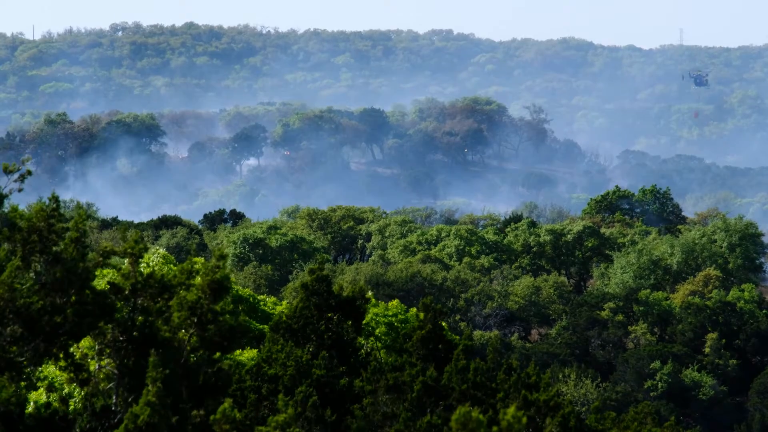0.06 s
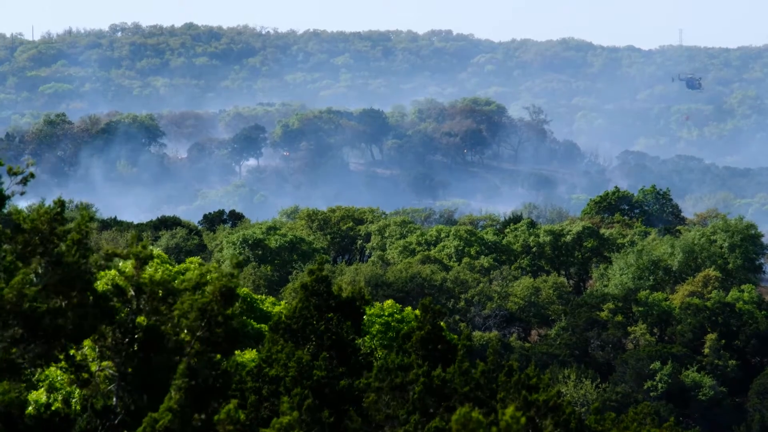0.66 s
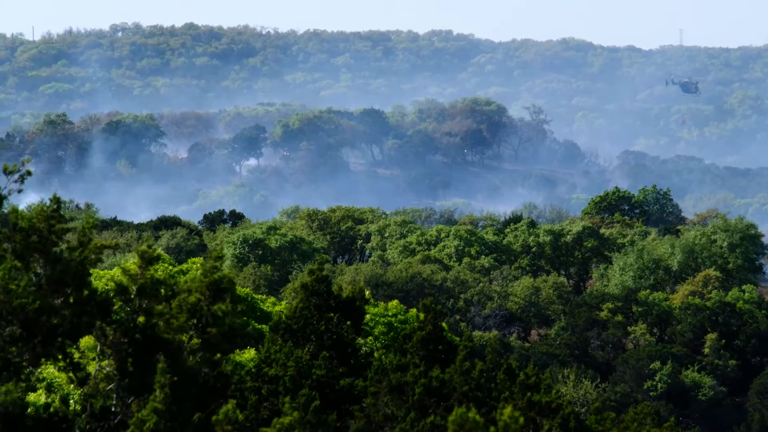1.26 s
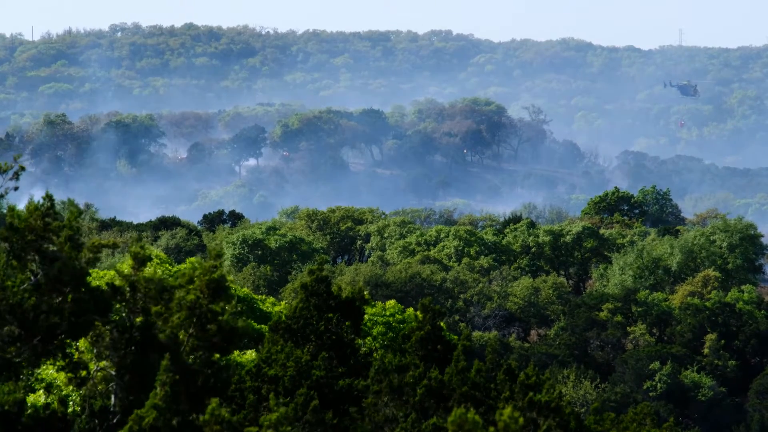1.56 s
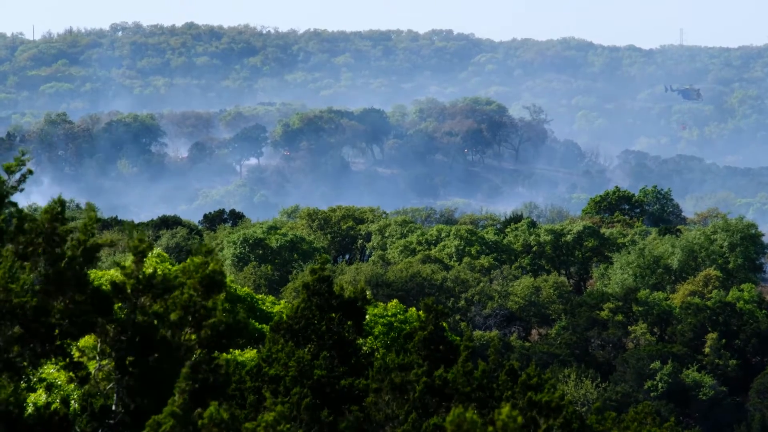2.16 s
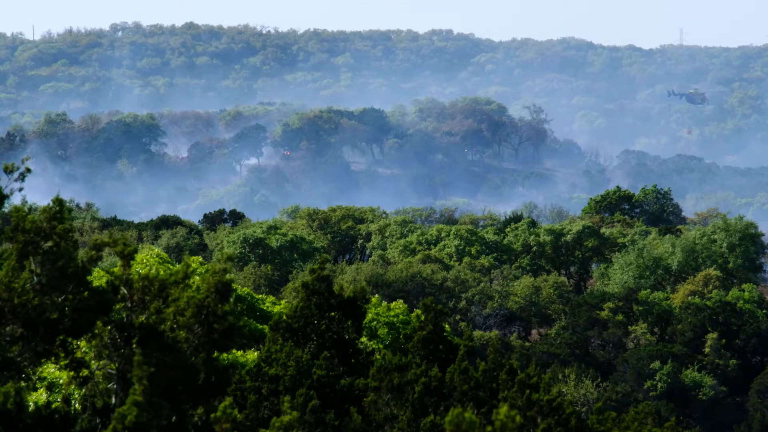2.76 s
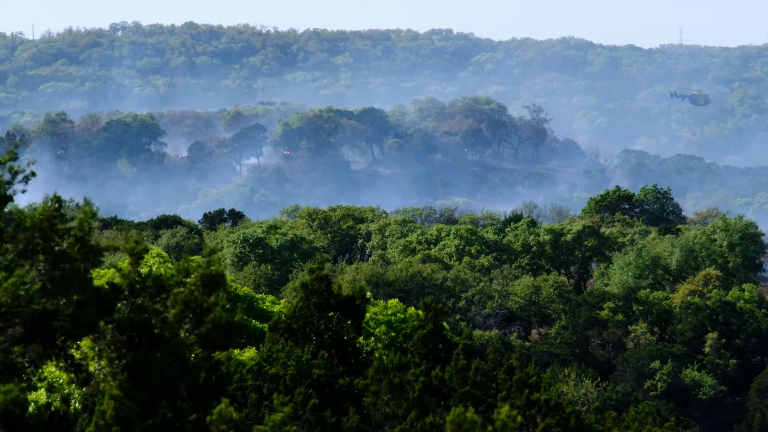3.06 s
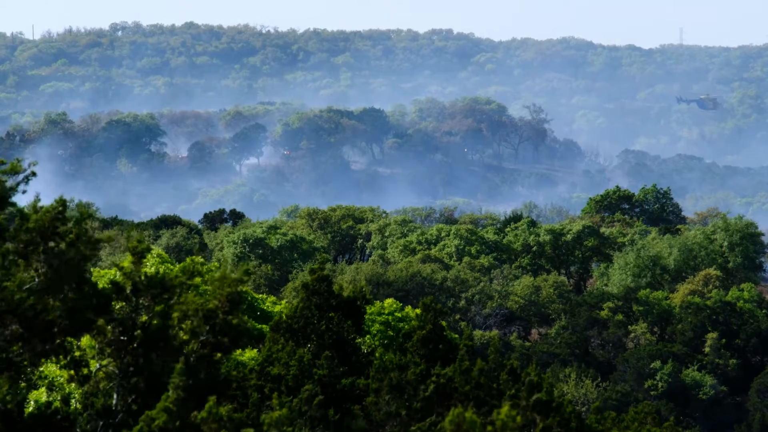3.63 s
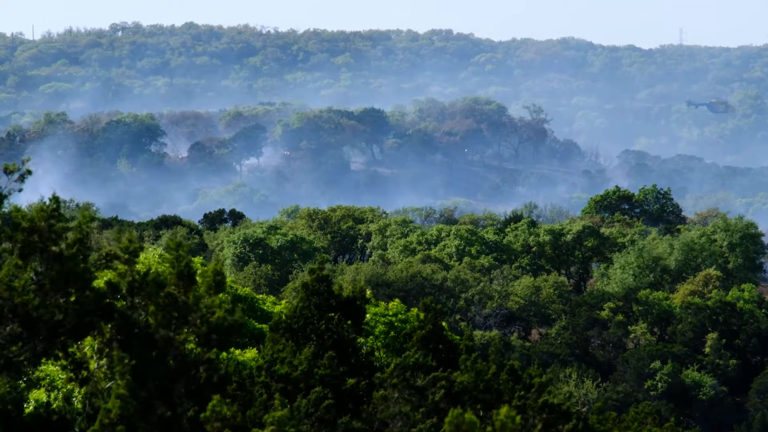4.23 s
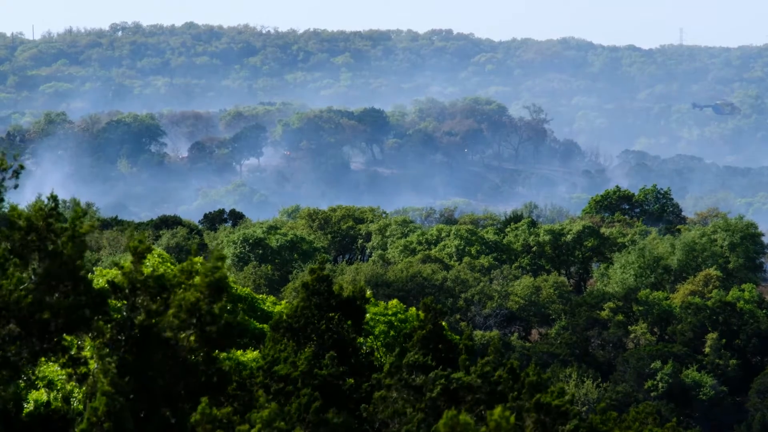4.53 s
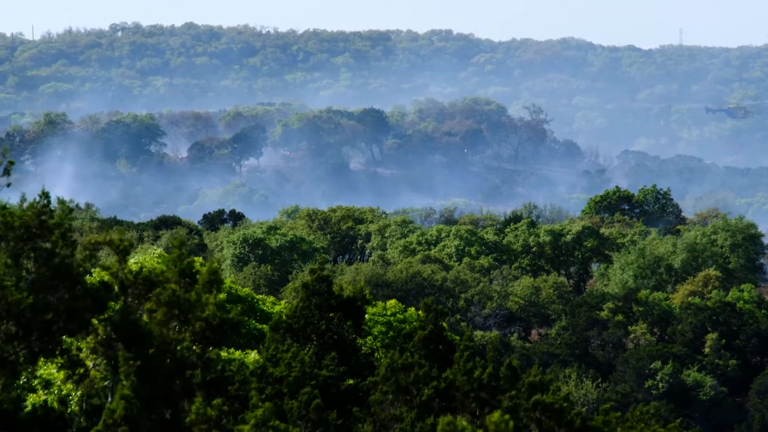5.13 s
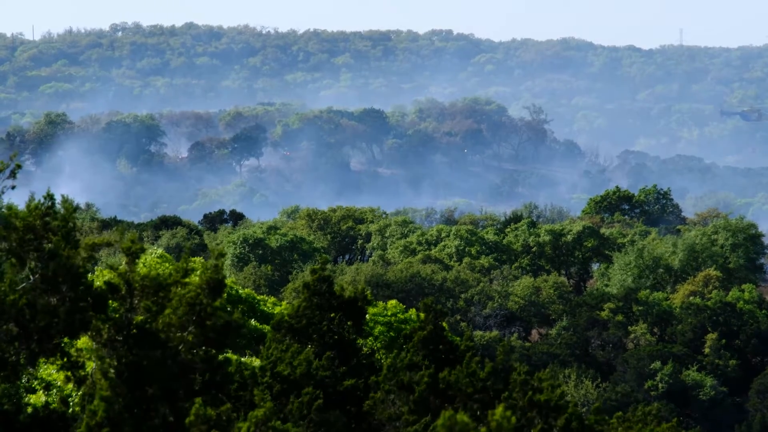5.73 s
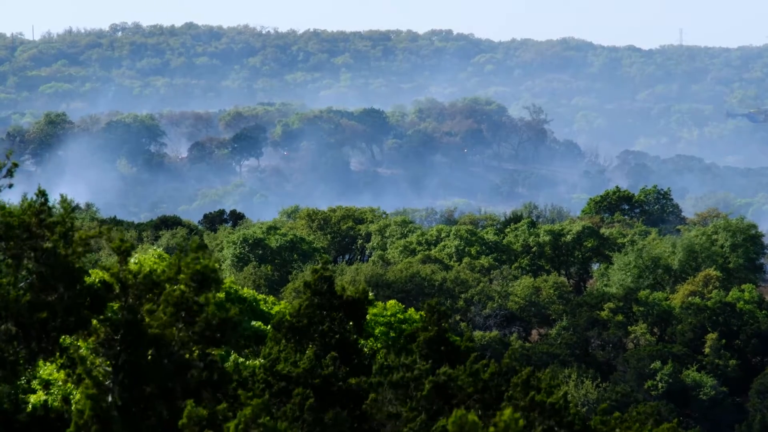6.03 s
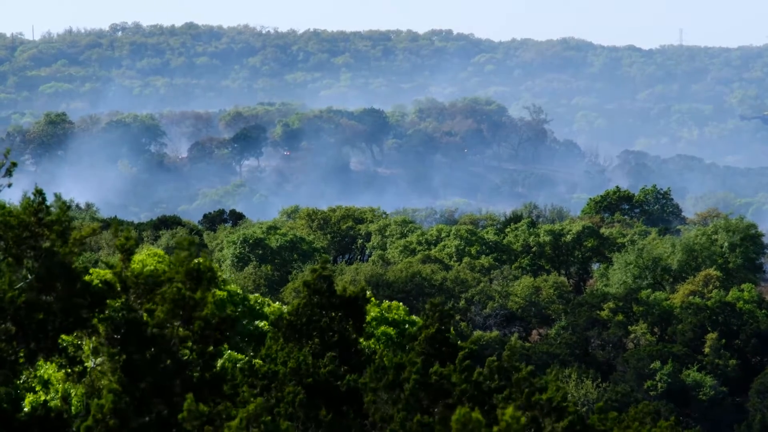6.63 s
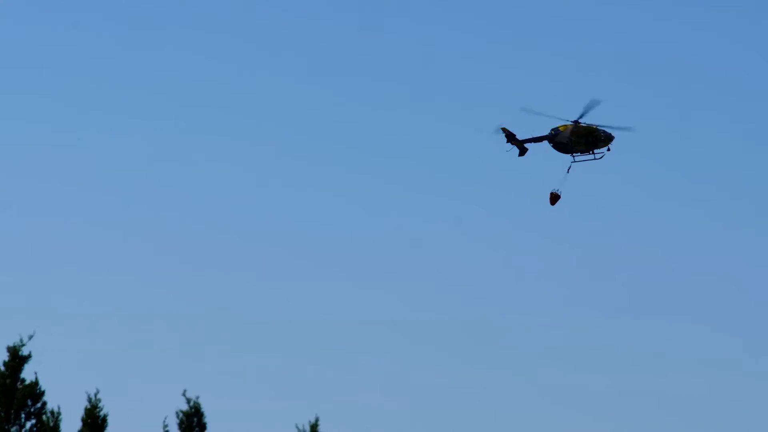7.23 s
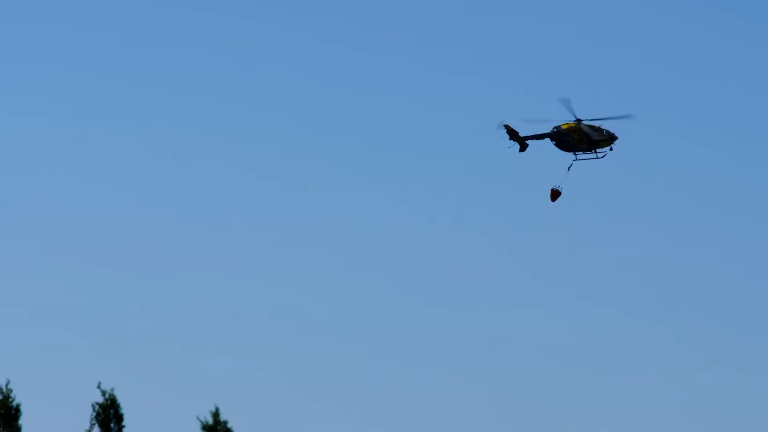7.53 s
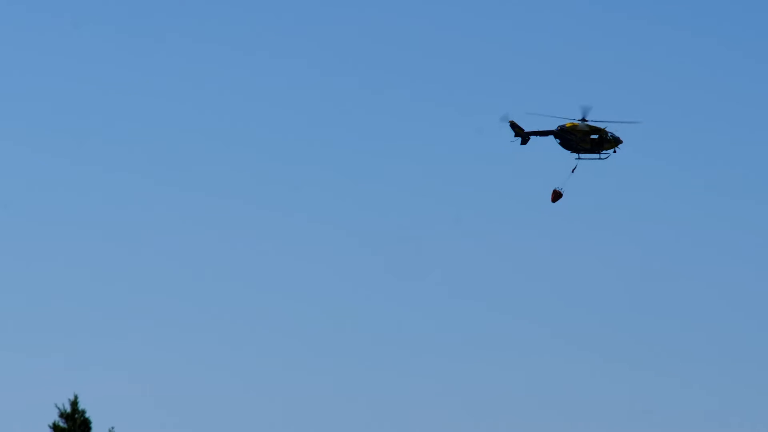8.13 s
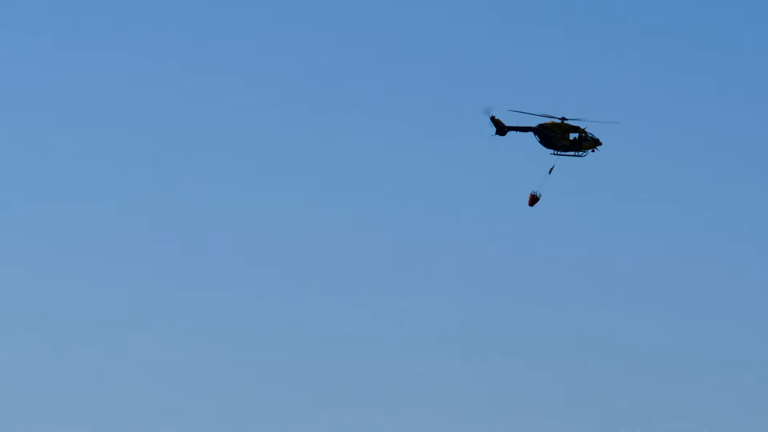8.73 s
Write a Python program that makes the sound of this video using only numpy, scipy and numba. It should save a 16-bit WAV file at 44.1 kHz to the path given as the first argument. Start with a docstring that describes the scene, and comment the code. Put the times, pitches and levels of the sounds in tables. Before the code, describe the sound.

A faint, faraway helicopter drones under thumping wind gusts, until it abruptly gives way to a close helicopter's steady, chopping roar.

```python
"""A helicopter flies near: both rotors chop its roar of churning air and hum their own blade tones.
This close pass follows a sudden cut. Before it, a helicopter drones far off over woodland, while
gusts thump the two openings (ports) of a camera microphone and a few taps and rustles sound close by.
The camera turns itself down under the strongest wind."""
import sys
import numpy as np
from scipy import signal
from scipy.fft import rfft, irfft, next_fast_len
from scipy.io import wavfile
from scipy.ndimage import uniform_filter1d, minimum_filter1d
from numba import njit

SR = 44100
rng = np.random.default_rng(int(sys.argv[2]) if len(sys.argv) > 2 else 0)


def bounce(signal):
    """Save signal as a 16-bit WAV file at the path given by the first command-line argument."""
    frames = np.transpose(np.atleast_2d(signal))
    limited = np.clip(frames, -1, 1)
    pcm = np.round(limited * 32767).astype(np.int16)
    wavfile.write(sys.argv[1], SR, pcm)


N = 387198
TIME = np.arange(N) / SR
CUT_S = 7.145  # the woods end and the close pass begins


def undb(db):
    """Turn decibels into a number to multiply a sound by."""
    return 10 ** (np.asarray(db) / 20)


def unit(x):
    """Scale a sound so that its average strength (rms) is 1."""
    return x / np.sqrt(np.mean(x ** 2))


def curve(table):
    """Join rows of (time, value) with straight lines."""
    return np.interp(TIME, *np.transpose(table))


def wander(per_s):
    """A smooth random wobble of size 1 that finds a new value about per_s times a second."""
    hold = max(int(SR / per_s), 2)
    steps = rng.standard_normal(N // 40)[np.arange(N) // hold % (N // 40)]
    return unit(uniform_filter1d(uniform_filter1d(steps, hold), hold))


def bump(peak_s, half_width_s):
    """A smooth rise and fall around one moment."""
    return np.exp(-np.minimum(((TIME - peak_s) / half_width_s) ** 2, 20))


def noise(colour):
    """Noise of strength 1, shaped by rows of (pitch_hz, level_db) and fading beyond their ends."""
    hz, db = np.transpose(colour)
    size = next_fast_len(N)
    freqs = np.maximum(np.arange(size // 2 + 1) * SR / size, 1)
    gain = undb(np.interp(np.log(freqs), np.log(hz), db))
    gain *= np.minimum(freqs / hz[0], 1) ** 2 * np.minimum(hz[-1] / freqs, 1) ** 4
    return unit(irfft(rfft(rng.standard_normal(size)) * gain)[:N])


def wide_noise(colour, side_db):
    """Stereo noise; side_db sets how much left and right differ."""
    return noise(colour) + undb(side_db) * noise(colour) * np.array([[1], [-1]])


def pan(db):
    """Left and right gains that make the left side louder by db."""
    return undb(np.array([[db], [-db]]) / 2)


def keep(x, hz, kind, order=2):
    """Keep the "low" or "high" side of hz; a higher order cuts more steeply."""
    return signal.sosfilt(signal.butter(order, min(hz, SR / 2 - 100), kind, fs=SR, output="sos"), x)


def add(out, start_s, sound):
    """Mix a short sound in at start_s."""
    i = max(int(start_s * SR), 0)
    out[..., i:i + sound.shape[-1]] += sound[..., :N - i]


@njit
def moving_lowpass(x, hz, damping):
    """Keep what lies below a moving pitch; with little damping it rings at that pitch."""
    y, band, low = np.empty(len(x)), 0., 0.
    for i in range(len(x)):
        g = np.tan(np.pi * hz[i] / SR)
        v = (band + g * (x[i] - low)) / (1 + g * (g + damping))
        y[i] = low + g * v
        band, low = 2 * v - band, 2 * y[i] - low
    return y


# The microphone's own noise: pitch_hz, level_db
HISS_COLOUR = [(2000, -14), (4000, -1.5), (6500, -4), (9000, -8.5), (15000, -16)]
def microphone_hiss(level_db):
    """A microphone makes a faint, steady hiss of its own."""
    return undb(level_db) * wide_noise(HISS_COLOUR, -2)


# The distant drone fading in and out on the wind: time_s, level_db
FAR_LEVEL = [(0, -34), (0.22, -32), (0.75, -34), (1.05, -32), (1.6, -35), (2.4, -36), (3.3, -33),
             (4.4, -34), (4.8, -35), (5.45, -31.5), (5.62, -34.5), (6.3, -32.5), (7.1, -39.5)]
# Its haze of sound: pitch_hz, level_db
FAR_COLOUR = [(18, -52.5), (30, -28), (43, -2), (118, 4), (146, 6.5), (167, -4.5), (319, -5), (345, -5),
              (396, -6.5), (428, -1.5), (462, -5), (541, -9.5), (899, -5), (2430, -32), (3200, -44),
              (4160, -67), (7040, -120)]
# How much of its treble the air lets through: time_s, change_db
FAR_TREBLE = [(0, -3), (0.22, -0.5), (0.6, 1), (1.05, 1), (1.5, 4.5), (2.4, -1), (3.3, -0.5), (4.3, 2),
              (5.1, 0.5), (6.1, 0), (7.1, 2.5)]
# Its faint tones: pitch_hz, level_db
FAR_TONES = [(118.4, -57), (145.3, -46.5), (193.8, -42), (355.3, -46.5), (425.3, -70)]
def far_helicopter(treble_hz=1050):
    """Distance smears the rotors into a haze; moving air fades the haze and the tones in and out."""
    # treetops scatter the higher sounds in from all sides
    scatter = wide_noise([(500, -24.5), (950, 4), (1500, -6), (2200, -18), (3200, -22)], 2.7)
    haze = wide_noise(FAR_COLOUR, -13.5) + undb(-19) * scatter
    haze *= undb(curve(FAR_LEVEL) + 0.5 + 1.1 * wander(14))
    treble = signal.sosfiltfilt(signal.butter(3, treble_hz, "high", fs=SR, output="sos"), haze)
    haze += treble * (undb(curve(FAR_TREBLE)) - 1)
    tones = 0
    for pitch_hz, level_db in FAR_TONES:
        gain = undb(level_db + 3.2 * wander(4))
        cycles = np.cumsum(pitch_hz * (1 + 0.00814 * wander(6))) / SR
        tones += gain * np.sin(2 * np.pi * cycles)
    return haze * pan(0.83) + tones


# The bright sheen on a rustle: pitch_hz, level_db
SHEEN_COLOUR = [(5000, -2.5), (6800, -5.0), (7800, -5), (9000, -5), (10200, -5.5), (11200, -11),
                (13000, -12), (15000, -24.5)]
# Soft rustles close by: peak_s, half_width_s, level_db, sheen_db, ring_hz
RUSTLES = [(1.335, 0.011, -47, -29, 7000), (1.55, 0.053, -57, -27, 7000), (1.7, 0.012, -59, -22, 7000),
           (1.81, 0.012, -53.5, -26, 7000), (1.981, 0.77, -57.5, -34, 7000), (2.558, 0.02, -50, 2.5, 8800),
           (2.66, 0.094, -60, -5, 6500), (3.35, 0.43, -70, -8, 6470), (4.02, 0.029, -50, -10, 8500),
           (4.135, 0.049, -55.5, -10, 6500), (4.252, 0.028, -51.5, -4.5, 10000),
           (4.305, 0.038, -55.5, -5, 9900), (4.365, 0.045, -59, -7.5, 7800), (4.415, 0.021, -47, -15, 7000)]
def rustles(grain_db=2, ring_db=-3, ring_width=0.12):
    """Brief, finely grained brushing noises, some with a high, ringing sheen."""
    brush = wide_noise([(1800, 16.5), (3300, 8), (5000, -3.5), (7000, -12), (12000, -52)], -2)
    sheen = wide_noise(SHEEN_COLOUR, 0.5)
    out = 0
    for peak_s, half_width_s, level_db, sheen_db, ring_hz in RUSTLES:
        ring = unit(signal.lfilter(*signal.iirpeak(ring_hz, 1 / ring_width, fs=SR), sheen))
        bright = undb(sheen_db) * (0.68 * sheen + undb(ring_db) * ring)
        out += undb(level_db) * bump(peak_s, half_width_s) * (brush + bright)
    return out * undb(grain_db * wander(600) - 2.5)


# The notes a tap rings with: pitch_hz, level_db, ring_s (time to fade by 60 dB)
TAP_NOTES = [(967, 3, 0.024), (1260, -7, 0.043), (1484, -4, 0.036), (1980, -10, 0.048), (2080, 0, 0.011),
             (2980, -3, 0.014), (3470, -11.5, 0.024), (3970, -6, 0.013), (6380, -17, 0.0085),
             (7400, -27, 0.0081)]
# Small hard taps by the camera: start_s, peak_db, left_minus_right_db, brightness_db_per_octave
TAPS = [(2.127, -20, -8.5, 2), (4.972, -30.5, -14, -3), (6.073, -22, -12, -11), (6.786, -13, -10.5, -9.5),
        (6.971, -24, -11, 5)]
def taps(snap_s=0.012):
    """Each tap snaps and rings the same short notes; a harder contact favours the high ones."""
    out = np.zeros((2, N))
    t = np.arange(SR // 10) / SR
    for start_s, peak_db, pan_db, brightness in TAPS:
        ring = 0
        for pitch_hz, level_db, ring_s in TAP_NOTES:
            gain = undb(level_db + brightness * np.log2(pitch_hz / 2000) - 60 * t / ring_s)
            ring += gain * np.sin(2 * np.pi * (pitch_hz * t + rng.random()))
        snap = keep(keep(rng.standard_normal(len(t)), 3500, "low"), 8000, "low")
        snap *= 2 * undb(-4 - 60 * t / snap_s)
        tap = (ring + snap) * (1 - np.exp(-t / 0.00038))
        add(out, start_s, undb(peak_db) * pan(pan_db) * tap / abs(tap).max())
    return out


# Gusts on the microphone's two ports: start_s, length_s, left_db, right_db
GUSTS = [(0.0, 0.044, -17, -15), (0.353, 0.35, -23.5, -21), (0.765, 0.11, -26.5, -28.5),
         (1.052, 0.29, -32, -21.5), (2.309, 0.06, -24, -29), (2.509, 0.08, -21.5, -17.5),
         (2.708, 0.023, -27, -20), (3.23, 0.037, -19, -24.5), (3.494, 0.11, -21.5, -24.5),
         (3.685, 0.21, -19.5, -24), (3.96, 0.12, -21, -24), (4.692, 0.29, -12.5, -22.5),
         (4.953, 0.081, -11, -23.5), (5.158, 0.15, -28.5, -13.5), (5.462, 0.025, -18.5, -18.5),
         (5.676, 0.038, -18, -30), (5.773, 0.081, -32, -17.5), (6.161, 0.18, -39.5, -16),
         (6.423, 0.35, -33, -18.5), (6.742, 0.18, -47, -8), (6.998, 0.076, -22, -14.5)]
def gusts(breeze_db=-42.5, rise_s=0.035, fall_s=0.076, sway_db=0.83):
    """Wind strength in dB at each port: gusts rise, hold and die away over a light breeze."""
    air = np.array([undb(breeze_db + 7.5 * wander(3.4)) for _ in range(2)])
    for start_s, length_s, left_db, right_db in GUSTS:
        before_s = np.maximum(start_s - TIME, 0)
        after_s = np.maximum(TIME - start_s - length_s, 0)
        shape = np.exp(-np.minimum(before_s / rise_s + after_s / fall_s, 20))
        air = np.maximum(air, undb([[left_db], [right_db]]) * shape)
    return [20 * np.log10(port) + sway_db * wander(9) for port in air]


def wind_rumble(gust_db, swirls_per_s=240):
    """Swirls of air stream past one port; faster air is louder and sheds smaller, higher ones."""
    flutter_db = 2.5 * wander(110)
    cutoff_hz = np.clip(285 * 2 ** ((gust_db + flutter_db + 6.5) / 17), 100, 640)
    arrivals = rng.random(N) < swirls_per_s / SR
    swirls = arrivals * np.sign(rng.standard_normal(N)) * (.5 + rng.random(N))
    rumble = moving_lowpass(unit(swirls) + undb(-6) * rng.standard_normal(N), cutoff_hz, 1.22)
    rumble = moving_lowpass(rumble, 2.35 * cutoff_hz, 1.2) / np.sqrt(cutoff_hz)
    rumble = keep(keep(rumble, 38, "high"), 57, "high")
    return unit(rumble * undb(flutter_db)) * undb(gust_db - 0.5)


# The hardest swirls to strike a port: time_s, level_db, pitch_hz, crack_db, port (-1 left, 1 right)
THUMPS = [(0.444, -2.5, 280, -54, -1), (0.777, -2.5, 297, -62, -1), (2.082, -6, 200, -52, 1),
          (2.543, 0, 275, -50, -1), (2.563, -2, 390, -50, 1), (2.588, 5, 236, -45, 1),
          (2.625, -2, 257, -52, -1), (3.554, -4.5, 254, -52, -1), (3.715, -0.5, 310, -60, -1),
          (3.819, 2.5, 357, -48, -1), (3.971, -4, 270, -52, 1), (4.078, -4, 253, -56, -1),
          (4.701, 5.5, 310, -37, -1), (4.735, -3, 230, -55, -1), (4.781, -18, 200, -17.5, -1),
          (4.819, 0, 360, -58, -1), (4.854, -0.5, 260, -34.5, -1), (4.895, 6.5, 473, -37, -1),
          (4.939, 0.5, 380, -31, -1), (4.984, 2.5, 476, -54, -1), (4.997, 4, 460, -57, -1),
          (5.011, -0.5, 440, -55, -1), (5.038, 2.5, 300, -51, -1), (5.146, -3.5, 310, -57, 1),
          (5.172, 3.5, 460, -57, 1), (5.202, -1.5, 280, -53, 1), (5.229, 0, 232, -34, 1),
          (5.281, -1, 238, -56, 1), (5.347, -2.5, 220, -52, 1), (5.455, -0.5, 258, -54, -1),
          (5.508, 2.5, 290, -39, 1), (5.663, -2, 297, -52, -1), (5.708, -5.5, 250, -54, -1),
          (5.785, -3, 220, -52, 1), (5.809, -0.5, 187, -56, 1), (6.174, -4, 376, -56, 1),
          (6.215, 1, 288, -36.5, 1), (6.244, -2, 300, -54, 1), (6.27, -4, 405, -57, 1),
          (6.493, -9, 190, -54, 1), (6.519, -5, 260, -52, 1), (6.559, -0.5, 327, -35, 1),
          (6.594, -3.5, 290, -52, 1), (6.641, 1.5, 200, -37, 1), (6.659, 1, 394, -41, 1),
          (6.684, 4.5, 325, -55, 1), (6.748, 1, 330, -50, 1), (6.831, 6.5, 420, -36.5, 1),
          (6.869, 3, 206, -34, 1), (6.89, 7.5, 296, -34, 1), (6.912, 5, 305, -60, 1),
          (6.956, 2.5, 377, -42, 1), (7.069, -1.5, 252, -35.5, 1)]
def wind_thumps(crack_s=0.00071, wake_s=0.0055, wake_hz=790):
    """A big swirl swings the air pressure; a tiny crack sounds with the crest of the swing, and a ragged wake
    follows."""
    out = np.zeros((2, N))
    t = np.arange(-1200, 1200) / SR
    for time_s, level_db, pitch_hz, crack_db, port in THUMPS:
        speed = pitch_hz / 330
        angle = 2 * np.pi * pitch_hz * t * np.exp(0.074 * rng.standard_normal())
        shape = 0.84 / np.cosh(np.clip(angle / 1.92, -30, 30))
        swing = keep(shape * np.cos(angle + 2 * np.pi * rng.random()), 60, "high")
        # a pointed crest joins the crack to the thump without a gap
        crest = np.exp(-abs(t) / 0.00015) + 0.1 * rng.standard_normal(len(t)) * np.exp(-abs(t) / crack_s)
        crack = keep(keep(crest, 430, "high"), 2700, "low", order=1)
        # smaller, quicker swirls break off behind the big one
        wake = keep(rng.standard_normal(len(t)), wake_hz * np.sqrt(speed), "low", order=8)
        wake = unit(keep(wake, 290, "high"))
        wake *= 1.16 * speed * np.exp(-np.logaddexp(t / wake_s, -t / 0.0017))
        thump = undb(-2) * swing + undb(crack_db + 22.5) * crack + undb(-18) * wake
        add(out[int(port > 0)], time_s + t[0], undb(level_db) * thump)
    return out


def calm_before_thumps(depth_db=5, lead_s=0.008, half_width_s=0.0054):
    """Gain for the rumble at each port: the air slackens just before a big swirl strikes."""
    slack = np.zeros((2, N))
    t = np.arange(-2400, 2400) / SR
    for time_s, _, _, _, port in THUMPS:
        add(slack[int(port > 0)], time_s - lead_s + t[0], np.exp(-(t / half_width_s) ** 2))
    return undb(-depth_db * np.minimum(slack, 1))


def turbine_hiss(from_db=-80.5, to_db=-58, turn_s=0.32):
    """The engine's hiss grows as the near helicopter turns side-on."""
    turned = 1 - np.exp(-np.maximum(TIME - CUT_S, 0) / turn_s)
    hiss = wide_noise([(3500, 8.5), (4300, 4.5), (4900, -1), (5500, -11.5)], -2)
    return hiss * undb(from_db + (to_db - from_db) * turned)


# Brief whooshes in the near helicopter's rush:
# peak_s, half_width_s, pitch_hz, half_width_octaves, level_db
SWELLS = [(7.25, 0.056, 552, 0.13, -28.5), (7.39, 0.07, 1370, 0.17, -29), (7.375, 0.052, 1880, 0.5, -35.5),
          (7.53, 0.078, 996, 0.16, -28.5), (7.98, 0.099, 605, 0.35, -26.5), (8.11, 0.081, 1355, 0.18, -30),
          (8.13, 0.054, 1840, 0.36, -31.5), (8.32, 0.11, 1530, 0.28, -30)]
def whoosh_swells():
    """Narrow bands of noise swell and fade, each at its own pitch."""
    out = 0
    for peak_s, half_width_s, pitch_hz, octaves, level_db in SWELLS:
        band = [(pitch_hz * 2 ** (k * octaves), -9 * abs(k) ** 1.5) for k in range(-3, 4)]
        out += undb(level_db) * bump(peak_s, half_width_s) * wide_noise(band, -16)
    return out


# The high rush of churning air: pitch_hz, level_db
RUSH_COLOUR = [(1100, -12.5), (1200, -6), (1280, 3.5), (1400, 1), (1800, -5), (2200, -7.5), (3000, -18.5),
               (4000, -31.5), (5000, -46.5), (5800, -48), (8000, -60.5), (12000, -70)]
# Its hollow middle band: pitch_hz, level_db
HOLLOW_COLOUR = [(430, -4), (580, -1), (700, -5), (810, -9), (900, -2.5), (1020, 0), (1100, -5.5),
                 (1200, -17.5)]
# How the whole rush rises and falls: time_s, level_db
RUSH_LEVEL = [(7.15, -33), (7.42, -32), (7.72, -35.5), (7.9, -33.5), (8.15, -31.5), (8.35, -33.5),
              (8.56, -33.5), (8.76, -30.5)]
def air_rush(fade_s=8.36, whoosh_hz=1324, rise_hz_per_s=195):
    """Churning air rushes, with a slowly rising whoosh and a hollow band that drops late in the turn."""
    fade_db = 7 * (1 + np.tanh((TIME - fade_s) / 0.067)) / 2
    hollow = wide_noise(HOLLOW_COLOUR, -20) * undb(4.5 - fade_db)
    rush = wide_noise(RUSH_COLOUR, -12.5) * undb(-1 + 1.1 * wander(22))
    pitch_hz = whoosh_hz + rise_hz_per_s * np.maximum(TIME - CUT_S, 0) + 54.5 * wander(4.8)
    whoosh = keep(moving_lowpass(rng.standard_normal(N), pitch_hz, 0.17), 1250, "high", order=4)
    whoosh = unit(keep(whoosh, 2200, "low", order=4)) * undb(-6 + 1.5 * wander(30))
    return undb(curve(RUSH_LEVEL)) * (rush + whoosh + hollow)


def blade_slaps(passes, top_hz, fade_s, uneven_db=4.5, jitter_s=0.0004):
    """Each blade cuts through the wake of the one before with a short, ragged slap."""
    out = np.zeros(N)
    t = np.arange(SR // 50) / SR
    pass_times = np.flatnonzero(np.diff(np.floor(passes)) > 0) / SR
    for time_s in pass_times[pass_times > CUT_S]:
        burst = unit(rng.standard_normal(len(t)) * np.exp(-t / fade_s))
        start_s = time_s + jitter_s * rng.standard_normal()
        add(out, start_s, burst * undb(uneven_db * rng.standard_normal()))
    out = keep(keep(out, top_hz, "low", order=4), top_hz / 5, "high")
    return out / np.std(out[TIME > CUT_S])


def blade_chop(passes, depth, sharpness):
    """Gain for the churning air: it swells as each blade passes, never twice with the same strength."""
    strength = undb(rng.standard_normal(1024))[np.round(passes).astype(int) % 1024]
    return unit(1 + depth * strength * np.exp(sharpness * (np.cos(2 * np.pi * passes) - 1)))


def blade_tones(passes, tones, waver_db, flutter_db, drift=0):
    """Tones at multiples of the blade rate waver in the air and flutter in the wake, high ones most."""
    out = 0
    for multiple, level_db in tones:
        wobble_db = np.sqrt(multiple) * (waver_db * wander(9) + flutter_db * wander(45))
        cycles = multiple * (passes + drift * wander(14)) + rng.random()
        out += undb(level_db + wobble_db) * np.sqrt(2) * np.sin(2 * np.pi * cycles)
    return out


# Main rotor tones: blade_rate_multiple, level_db
MAIN_TONES = [(3, -27.5), (5, -6), (7, -16.5), (10, -18), (17, -20.5)]
# Tail rotor tones: blade_rate_multiple, peak_db, peak_s, fall_db_per_s (on either side of the peak)
TAIL_TONES = [(2, -7, 8.2, 9), (3, -5.5, 8.5, 9.5), (5, -3.5, 8.25, 11.5), (6, -17.5, 8.5, 11)]
def rotor_hum(main_passes, tail_passes):
    """Both rotors hum; as the helicopter turns, each tail tone sweeps past the listener like a beam."""
    beams = [(multiple, peak_db - fall * abs(TIME - peak_s))
             for multiple, peak_db, peak_s, fall in TAIL_TONES]
    main = blade_tones(main_passes, MAIN_TONES, waver_db=0.24, flutter_db=0.25)
    return main + blade_tones(tail_passes, beams, waver_db=0.5, flutter_db=1.44, drift=0.013)


# How often a tail rotor blade is heard to pass: time_s, rate_hz
TAIL_RATE = [(7.15, 66.56), (7.9, 67.47), (8.3, 67.67), (8.78, 68.68)]
# The low roar of churning air: pitch_hz, level_db
ROAR_COLOUR = [(25, -45.5), (45, -11.5), (80, -6), (150, 2.5), (300, 2), (450, 0.5), (600, -1.5), (700, -7),
               (830, -15.5), (1100, -55)]
def near_helicopter(main_per_tail=0.35):
    """Both rotors chop the roar and the rush, slap through their wakes and hum their own tones."""
    tail_passes = np.cumsum(curve(TAIL_RATE)) / SR  # a running count of blades gone by
    main_passes = main_per_tail * tail_passes
    roar = wide_noise(ROAR_COLOUR, -15.5)
    roar *= blade_chop(main_passes, 0.43, 2.1) * blade_chop(tail_passes, 0.5, 1.7)
    rush = air_rush() + whoosh_swells()
    rush *= blade_chop(main_passes, 0.12, 1.8) * blade_chop(tail_passes, 0.21, 3.9)
    slaps = undb(-34) * blade_slaps(main_passes, top_hz=570, fade_s=0.0027)
    slaps += undb(-36) * blade_slaps(tail_passes, top_hz=1580, fade_s=0.0018)
    low = undb(-24) * roar + undb(-21) * rotor_hum(main_passes, tail_passes)
    return low * pan(-0.7) + (rush + slaps) * pan(0.3) + turbine_hiss()


def scene():
    """The windy woods, then a cut to the close pass."""
    rumble = np.array([wind_rumble(gust_db) for gust_db in gusts()])
    wind = rumble * calm_before_thumps() + wind_thumps()
    woods = far_helicopter() + wind + taps() + rustles()
    cut = np.clip((TIME - CUT_S) / 0.0016, 0, 1)
    return (1 - cut) * woods + cut * near_helicopter() + microphone_hiss(-75)


def record(dry, threshold_db=-17, slope=0.72, window_s=0.091, top_hz=15400):
    """The camera turns down while its ports disagree, as in wind, then adds hiss and cuts the top."""
    smooth = SR // 100
    mismatch = uniform_filter1d((dry[0] - dry[1]) ** 2, int(window_s * SR))
    mismatch = np.maximum(uniform_filter1d(mismatch, smooth), 0)
    ducked = dry * (1 + mismatch / undb(threshold_db) ** 2) ** (-slope / 2)
    # a limiter dips just ahead of the hardest thumps to keep them round
    safe_gain = .85 / np.maximum(abs(ducked).max(axis=0), .85)
    limiter = uniform_filter1d(minimum_filter1d(safe_gain, smooth), smooth)
    sound = ducked * limiter + microphone_hiss(-79)
    return signal.sosfilt(signal.ellip(8, .2, 70, top_hz, fs=SR, output="sos"), sound)


dry = scene()
out = record(dry)
bounce(out)
```